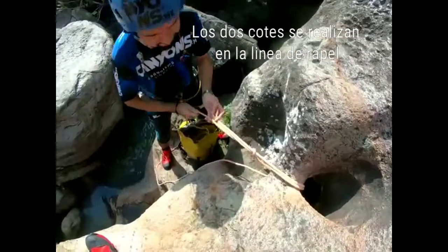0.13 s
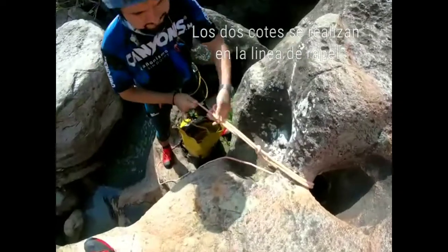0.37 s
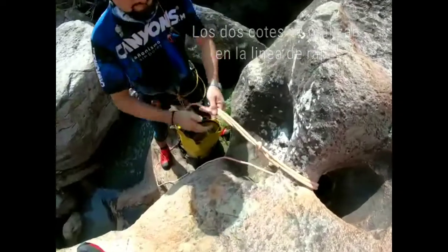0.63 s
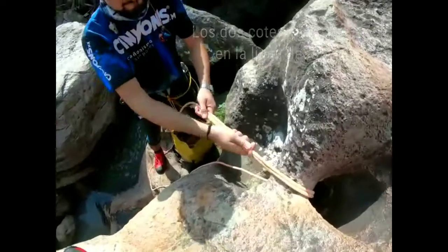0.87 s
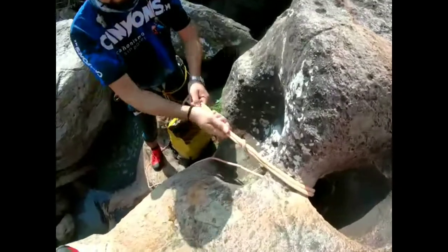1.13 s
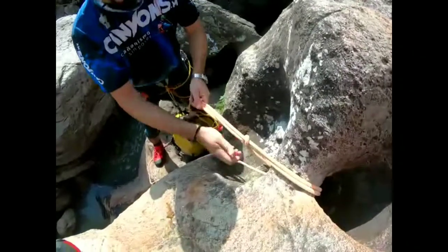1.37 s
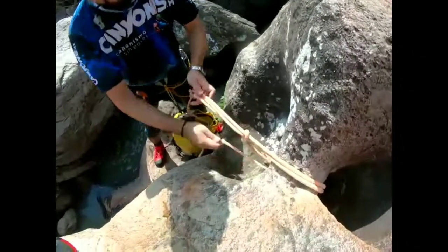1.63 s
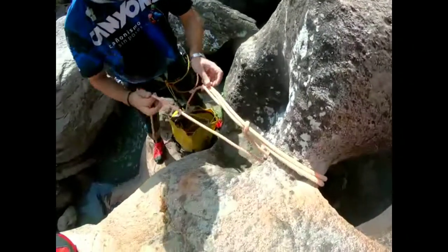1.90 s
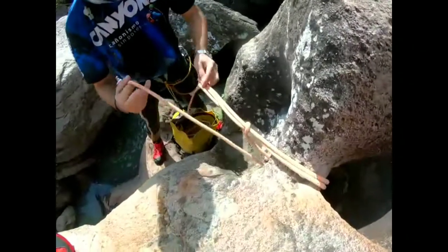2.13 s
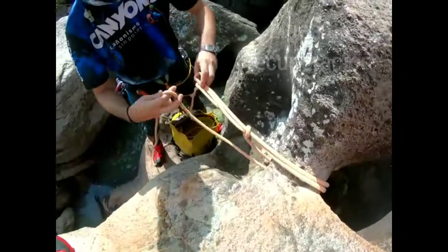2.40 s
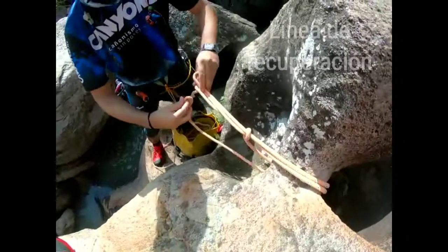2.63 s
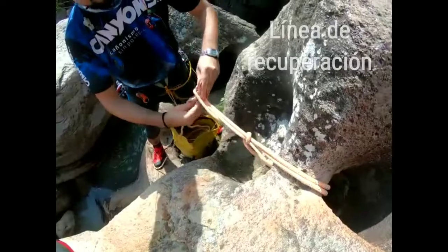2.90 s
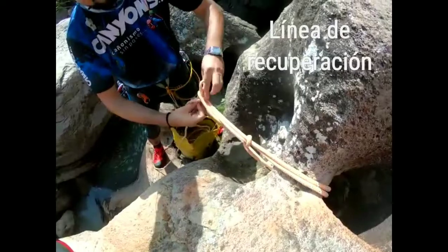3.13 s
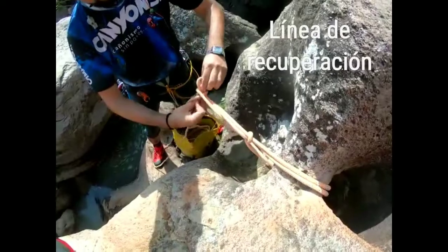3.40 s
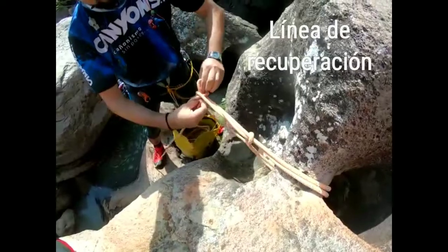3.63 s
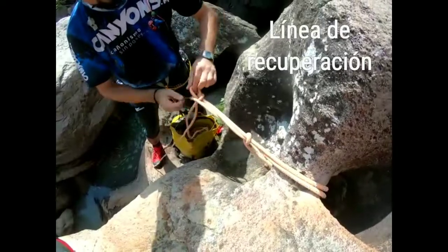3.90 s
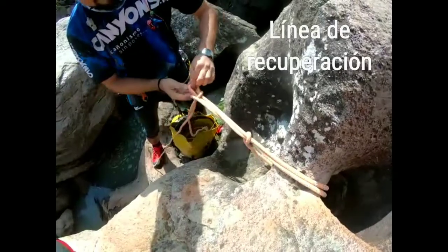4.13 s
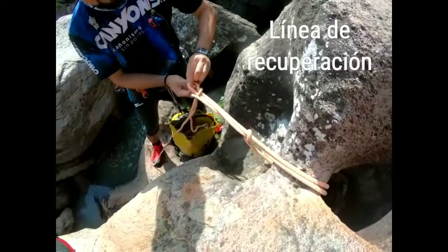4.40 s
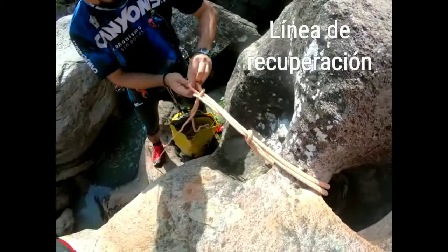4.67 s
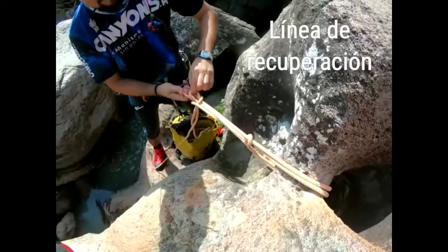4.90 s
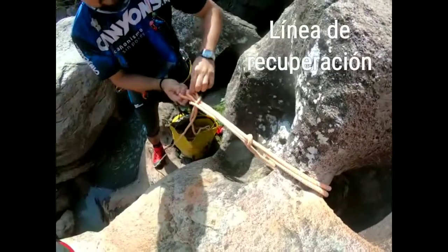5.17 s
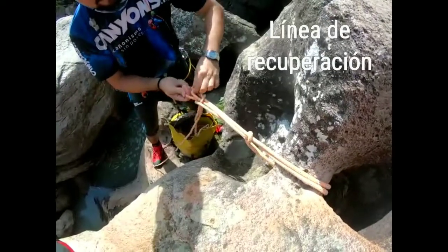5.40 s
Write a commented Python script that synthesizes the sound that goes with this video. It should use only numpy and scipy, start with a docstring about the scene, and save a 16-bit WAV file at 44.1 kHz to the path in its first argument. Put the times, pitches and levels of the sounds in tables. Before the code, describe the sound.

Steady hissing stream water in a rocky canyon, with a hand-held camera mount thumping and rumbling early, then a sharp hard crack at about four seconds.

```python
"""Water rushes steadily between boulders, heard through the two ports of a small sealed camera.
The hand-held mount rumbles and hums as it is gripped and moved, and is rubbed now and then.
Dull knocks travel through the housing as a tick followed by a falling thump; hard contacts ring the shell.
The water is surging noise in the air, handling is low noise and dull grains, and blows are filtered pulses."""
import sys
import numpy as np
from scipy import signal
from scipy.fft import rfft, irfft, next_fast_len
from scipy.io import wavfile

SR = 44100
rng = np.random.default_rng(int(sys.argv[2]) if len(sys.argv) > 2 else 0)


def output_pcm(signal):
    """Save a mono or channel-first signal as 16-bit PCM at the path in sys.argv[1].

    Samples are clipped to [-1, 1] before scaling.
    """
    pcm = np.clip(np.atleast_2d(signal).T, -1, 1) * 32767
    wavfile.write(sys.argv[1], SR, np.round(pcm).astype(np.int16))


def nominal_scale(level):
    """Amplitude ratio for a level in decibels (scalar or array-like)."""
    x = np.asarray(level, float) / 20
    return 10 ** x


N = 243873   # samples, about 5.5 s


def rms_one(x):
    """Scales to unit power."""
    return x / np.sqrt(np.mean(x ** 2) + 1e-20)


def in_time(rows):
    """Every column of a curve, interpolated at every sample."""
    time_s, *columns = np.transpose(rows)
    return [np.interp(np.arange(N) / SR, time_s, column) for column in columns]


def at_hz(points, hz):
    """Every column of a spectrum, interpolated over log frequency."""
    point_hz, *columns = np.transpose(points)
    return [np.interp(np.log(hz + 1), np.log(point_hz), column) for column in columns]


def drift(rate_hz):
    """Slow random wander of spread 1: noise at SR / 40 through two equal low-pass poles at rate_hz."""
    r = np.exp(-80 * np.pi * rate_hz / SR)
    noise = rng.standard_normal(N // 40 + 2002)
    slow = signal.lfilter([1], [1, -2 * r, r * r], noise)[2000:]   # skip the filter's settling
    return np.interp(np.arange(N) / 40, np.arange(len(slow)), rms_one(slow))


def swells(floor_db, rows):
    """A level in dB: the floor with a smooth rise and fall in power added for each row."""
    power, t = nominal_scale(2 * floor_db), np.arange(N) / SR
    for top_s, level_db, length_s in rows:
        phase = np.pi * np.clip((t - top_s) / length_s, -0.5, 0.5)
        power = power + nominal_scale(2 * level_db) * np.cos(phase) ** 4
    return 10 * np.log10(power)


def peak_one(x):
    """Scales the right channel to a peak of 1, then opens the frame softly and fades it to its end."""
    samples = x.shape[1]
    opening = np.sin(np.pi / 2 * np.minimum(np.arange(samples) / 16, 1)) ** 2
    closing = np.cos(np.linspace(0, np.pi / 2, samples)) ** 2
    return opening * closing * x / np.max(np.abs(x[1]))


# How the two microphone ports colour sound:
# pitch_hz, right_relative_db, left_over_right_db, likeness (0-1), left_lead_rad
PORT_RESPONSE = [(120, -25, -3, 0.4, 0.5), (284, -22, -1, 0.84, -0.5), (530, -20, -3, 0.39, -3.5),
                 (808, -12.5, -2, 0.87, -2.5), (1040, -6.5, -4.5, 1, -3.5), (1372, -9.5, 2.5, 0.96, -4),
                 (1697, 1.5, -3.5, 1, -5), (1980, -3, -4.5, 0.99, -5.5), (2960, -9, -6, 0.8, -6),
                 (3230, -9.5, 5.5, 0.95, -5.5), (3850, -16, -8.5, 0.26, -7), (4156, -14, 2.5, 0.53, -4),
                 (4880, -15.5, -28, 0, -7), (5430, -11, -4.5, 0.62, -9.5), (6150, -14, -10, 0.6, -5.5),
                 (6800, -20.5, 1.5, 0.56, -3.5), (8110, -31, 1, 0.3, -5.5), (9580, -44, 12, 0.5, -1.5),
                 (10030, -55, 5, .4, -8), (11400, -59.5, -4, 0.6, 2.5)]


def ports(direct, scattered):
    """The right port hears the direct sound; the left hears it turned in phase and mixed with scattered sound."""
    size = len(direct)
    right_db, left_db, alike, lead_rad = at_hz(PORT_RESPONSE, np.arange(size // 2 + 1) * SR / size)
    alike = np.clip(alike, 0, 1)
    right = rfft(direct)
    left = alike * np.exp(1j * lead_rad) * right
    left = left + np.sqrt(1 - alike ** 2) * rfft(scattered)
    return irfft(nominal_scale(right_db) * np.array([nominal_scale(left_db) * left, right]), size)


# Level of the water, as rms of the mean of both ports: time_s, level_db
STREAM_LEVEL = [(0.0, -45.5), (1.74, -45.5), (2.05, -46.5), (3.71, -45), (5.1, -45), (5.53, -46)]


def stream():
    """Noise for the hiss of countless bursting bubbles; it surges as a whole and in half-octave patches."""
    surge_db = 0.65 * drift(23) + 0.69 * drift(24)
    hiss = 0
    white = rng.standard_normal((2, 2, N))   # two noise pairs, used by alternate bands
    edges_hz = 250 * 2 ** np.arange(0, 6.1, 0.5)
    for k, (low_hz, high_hz) in enumerate(zip(edges_hz, edges_hz[1:])):
        band_pass = signal.butter(2, [low_hz, high_hz], "band", fs=SR, output="sos")
        band = signal.sosfilt(band_pass, white[k % 2])
        hiss = hiss + band * nominal_scale(surge_db + 1.4 * drift(11.7))
    lag = round(0.0047 * SR)   # an echo off the nearest rock ripples the colour
    hiss = hiss + 0.095 * np.roll(hiss, lag, axis=1)
    heard = ports(*np.pad(hiss, ((0, 0), (0, N % 2))))[:, :N]   # padded to an even length
    return nominal_scale(in_time(STREAM_LEVEL)[0]) * heard / np.sqrt(np.mean(heard.mean(axis=0) ** 2))


# Knocks on the mount, with right-port levels:
# start_s, snap_peak_db, thump_peak_db (peaks before frame fade and limiter), thump_hz, thump_damping
KNOCK_TIMES = [(0.0334, -12, -10.5, 123, 3), (0.107, -17.5, -15.5, 114, 1.3),
               (0.242, -22, -12.5, 83.5, 1.8), (0.7274, -38, -24.5, 131, 1.5), (.742, -34, -24.5, 130, 2.4),
               (.759, -35, -23, 102, 1.1), (0.778, -27, -24.5, 114, 1.1), (0.8549, -18, -21.5, 120, 1.1),
               (0.8746, -17, -20, 120, 1.1), (0.907, -21, -18, 120, 1), (0.9708, -20.5, -19, 120, 1.8),
               (1.8755, -30, -18.5, 161, 0.24), (4.2773, -27, -4.5, 154, 0.75), (4.307, -30, -31, 247, .97),
               (4.316, -33, -33, 150, .97), (5.064, -29.5, -31.5, 91, 1.2)]


def knocks():
    """Each blow is a snap and a thump; bending waves are slower when low, so the pitch falls."""
    size = 4096
    out = np.zeros((2, N + size))
    hz = np.arange(size // 2 + 1) * SR / size
    s = 1j * hz

    def band(centre_hz, damping):
        """Response of a damped resonance, 1 at its centre."""
        damped = s * damping / centre_hz
        return damped / (1 + damped + (s / centre_hz) ** 2)

    lead_rad = at_hz(PORT_RESPONSE, hz)[3]
    sides = np.array([np.exp(0.65j * lead_rad), np.ones(len(hz))])   # the left port mostly lags
    for start_s, snap_db, thump_db, thump_hz, damping in KNOCK_TIMES:
        late = sides * np.exp(-2j * 5.2 * np.arctan(hz / (2.29 * thump_hz)))   # delays the lows most
        snap_dulling = (1 - (hz / 900) ** 2 + s * 0.88 / 900) ** 3
        snap = peak_one(irfft(late * band(230, 1.9) / snap_dulling, size))
        thump_dulling = 1 + (hz / (1.94 * thump_hz)) ** 6
        thump_colour = band(thump_hz, damping) * band(thump_hz, 3.8) / thump_dulling
        thump = peak_one(irfft(late * thump_colour, size))
        i = round(start_s * SR)
        out[:, i:i + size] += nominal_scale([[-11.0 + snap_db], [snap_db]]) * snap      # left is weaker
        out[:, i:i + size] += nominal_scale([[-4.0 + thump_db], [thump_db]]) * thump
    return out[:, :N]


# Ringing modes of the camera's shell: pitch_hz, gain_db, t60_s
SHELL_MODES = [(1050, 5, 0.0024), (1780, -8, 0.0057), (2500, -9.5, 0.0049), (3600, -10, 0.0066),
               (5140, -1.5, 0.006), (6140, -6, 0.0023), (8000, -10, 0.00068), (10900, 21.5, 0.0016)]


def shell(x):
    """A hard contact passes as a click and leaves the shell's damped modes ringing briefly."""
    out = x
    for pitch_hz, gain_db, t60_s in SHELL_MODES:
        r = nominal_scale(-60 / (t60_s * SR))
        w = 2 * np.pi * pitch_hz / SR
        ring = signal.lfilter([0, np.sin(w)], [1, -2 * r * np.cos(w), r * r], x)
        out = out + nominal_scale(gain_db) * ring
    return out


# Something hard touches the shell:
# start_s, level_db (right-port gain before the frame fades and limiter), dulled_above_hz
CRACK_TIMES = [(0.0338, -9.5, 1670), (1.874, -32, 2000), (1.8778, -29, 2500), (1.8799, -14.5, 11000),
               (1.882, -17, 5000), (4.2789, -1.5, 2420), (4.307, -21, 2500), (4.316, -10, 6000)]


def cracks():
    """A hard contact, then a little grit, rings the shell and leaves through the ports."""
    size = 4096
    out = np.zeros((2, N + size))
    chips = rng.standard_normal((len(CRACK_TIMES), 2, 200))
    grit_decay = nominal_scale(-60 * np.arange(200) / SR / 0.0038)   # 60 dB in 3.8 ms
    for (start_s, crack_db, dull_hz), chip in zip(CRACK_TIMES, chips):
        burst = 0.26 * chip * grit_decay
        burst[:, 0] = -1   # the contact itself
        burst = np.pad(burst, ((0, 0), (20, size - 220)))
        burst = signal.lfilter(*signal.butter(3, min(dull_hz, 15000), fs=SR), burst)
        crack = peak_one(ports(*shell(burst))) * np.exp(-np.arange(size) / 500)
        i = round(start_s * SR)
        out[:, i:i + size] += nominal_scale(crack_db) * crack
    return out[:, :N]


# A hand rubs the mount: start_s, length_s, first_db, last_db (stroke gain on the grains, before a 6 dB lift)
RUB_TIMES = [(0.117, 0.058, -45, -49), (0.665, 0.15, -56.5, -50), (5.065, 0.11, -52, -60.5)]


def rubs():
    """Skin slips on the mount in dense dull grains; the left port hears them weaker and partly reversed."""
    attack_s, release_s = 0.0072, 0.0087
    stroke, t = 0, np.arange(N) / SR
    for start_s, length_s, first_db, last_db in RUB_TIMES:
        end_s = start_s + length_s
        corners_s = [start_s - attack_s, start_s, end_s, end_s + release_s]
        stroke = stroke + np.interp(t, corners_s, [0, nominal_scale(first_db), nominal_scale(last_db), 0])
    struck = rng.random(N) < 3000 / SR   # about 3000 grains per second
    slips = rng.standard_normal((2, N)) * struck * nominal_scale(1.5 * drift(40))
    dull = signal.butter(3, [200, 1150], "band", fs=SR, output="sos")
    right, other = rms_one(signal.sosfilt(dull, slips))
    left = nominal_scale(-13.5) * (other - 0.73 * right)
    return nominal_scale(6.0) * stroke * np.array([left, right])


def shaken(spectrum, alike, lead_rad, left_db, lumpy_db, lump_rate_hz):
    """Lumpy low noise carried by the housing, partly shared by the two microphones, at unit mean power."""
    size = next_fast_len(N)
    noise = rng.standard_normal((2, N)) * nominal_scale(lumpy_db * drift(lump_rate_hz))
    one, other = rfft(noise, size)
    left = nominal_scale(left_db) * (alike * np.exp(1j * lead_rad) * one + np.sqrt(1 - alike ** 2) * other)
    colour = nominal_scale(at_hz(spectrum, np.arange(len(one)) * SR / size)[0])
    both = irfft(colour * np.array([left, one]), size)[:, :N]
    return both / np.sqrt(np.mean(both.mean(axis=0) ** 2))


# Unrest of the hand on the mount, the floor of the rumble: time_s, level_db
GRIP_UNREST = [(0.0, -30), (0.4, -34), (0.75, -32), (1.19, -37), (1.5, -35), (1.95, -36), (2.3, -46.5),
               (2.9, -48.5), (3.3, -56), (3.5, -48.5), (4.1, -47.5), (4.42, -54), (4.8, -44), (5.3, -49.5),
               (5.53, -46.5)]
# The hand heaves the mount, adding rumble power: top_s, level_db, length_s
GRIP_HEAVES = [(0.262, -20, 0.15), (0.487, -24, 0.04), (0.754, -32, 0.048), (0.983, -20.5, 0.057),
               (1.279, -25.5, 0.13), (1.627, -35.5, 0.078), (1.813, -25.5, 0.094), (2.038, -36.5, 0.19),
               (2.258, -36, 0.063), (2.52, -50.5, 0.27), (2.924, -41, 0.31), (3.464, -37, 0.098),
               (3.589, -44, 0.2), (3.926, -37.5, .1), (4.305, -31, 0.15), (4.52, -42, 0.18),
               (4.857, -37, 0.15), (5.064, -32.5, 0.09), (5.161, -39.5, 0.16), (5.43, -38.5, 0.085)]
# Fingers shift and the hum swells, adding hum power: top_s, level_db, length_s
FINGER_SHIFTS = [(0.06, -31, 0.027), (0.147, -37.5, 0.17), (0.282, -38, 0.072), (0.456, -49, 0.082),
                 (0.762, -41.5, 0.11), (1.33, -60.5, 0.047), (1.498, -60, 0.14), (2.132, -58, 0.14),
                 (2.388, -48.5, 0.077), (3.881, -46, .12), (4.78, -44.5, 0.11), (5.119, -44.5, 0.16)]
# Colour of the slow sway: pitch_hz, relative_db
RUMBLE_COLOUR = [(15, -3.5), (28, -4), (42, -6.5), (57, -7), (72, -29.5), (200, -102.5), (800, -130)]
# Colour of the jolts: pitch_hz, relative_db
JOLT_COLOUR = [(35, -29), (57, 3.5), (75, -4), (115, -9), (200, -38), (400, -66.5), (1500, -120)]
# Colour of the housing's hum: pitch_hz, relative_db
HUM_COLOUR = [(80, -31.5), (115, -17), (145, 5.5), (185, 2.5), (250, -10), (310, -20), (400, -35),
              (600, -70), (2000, -120)]


def grip():
    """Slow sway of the mount, jolts that grow faster than the sway in dB, and a hum of the housing."""
    unrest_db, = in_time(GRIP_UNREST)
    rumble_db = swells(unrest_db, GRIP_HEAVES)
    # the hum's floor is -59.5 dB at an unrest of -48 dB and follows 0.38 of its swing
    hum_db = swells(-59.5 + 0.38 * (unrest_db + 48), FINGER_SHIFTS)
    jolt_db = rumble_db - 4.0 + 0.48 * (rumble_db + 25.5)
    rumble = shaken(RUMBLE_COLOUR, alike=0.92, lead_rad=-0.9, left_db=-2.0, lumpy_db=1.0, lump_rate_hz=2.5)
    jolt = shaken(JOLT_COLOUR, alike=0.9, lead_rad=-0.83, left_db=-3.0, lumpy_db=2.0, lump_rate_hz=5.1)
    hum = shaken(HUM_COLOUR, alike=0.74, lead_rad=-1.5, left_db=-4.5, lumpy_db=4.0, lump_rate_hz=18.5)
    return nominal_scale(rumble_db) * rumble + nominal_scale(jolt_db) * jolt + nominal_scale(hum_db) * hum


def scene():
    """Water through the air, everything else through the housing."""
    return stream() + knocks() + cracks() + rubs() + grip()


def roll_off(x):
    """The treble ends steeply here."""
    return signal.sosfilt(signal.butter(12, 14000, fs=SR, output="sos"), x)


def record(dry):
    """A limiter ducks both channels for a moment when a peak passes -10.8 dB."""
    peak_db = 20 * np.log10(np.max(np.abs(dry), axis=0) + 1e-9)
    over_db = np.maximum(peak_db + 10.8, 0)
    release_db = 100 * np.arange(N) / SR   # the held excess falls 100 dB per second
    held_db = np.maximum.accumulate(over_db + release_db) - release_db
    r = np.exp(-1 / (0.00078 * SR))        # 0.78 ms smoothing
    gain = nominal_scale(-0.9 * signal.lfilter([1 - r], [1, -r], held_db))
    return roll_off(dry * gain)


dry = scene()
out = record(dry)
output_pcm(out)
```